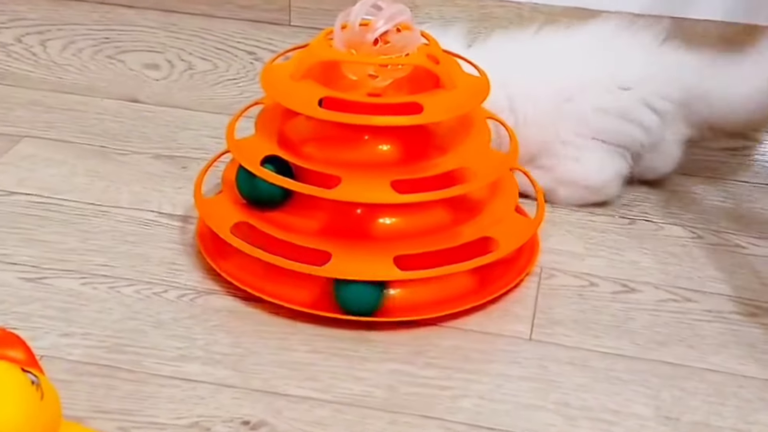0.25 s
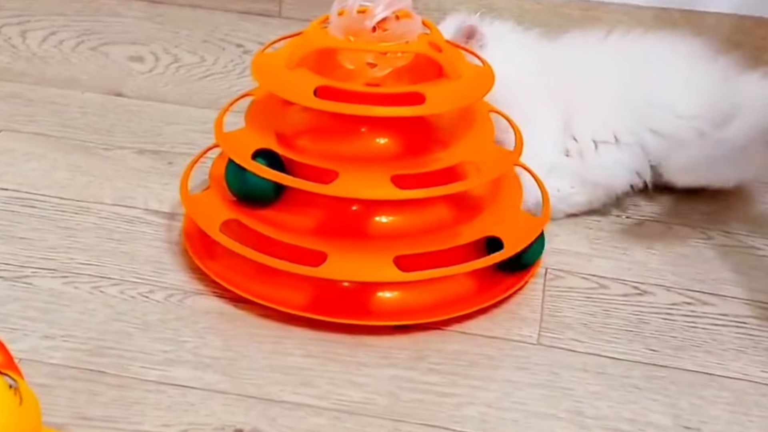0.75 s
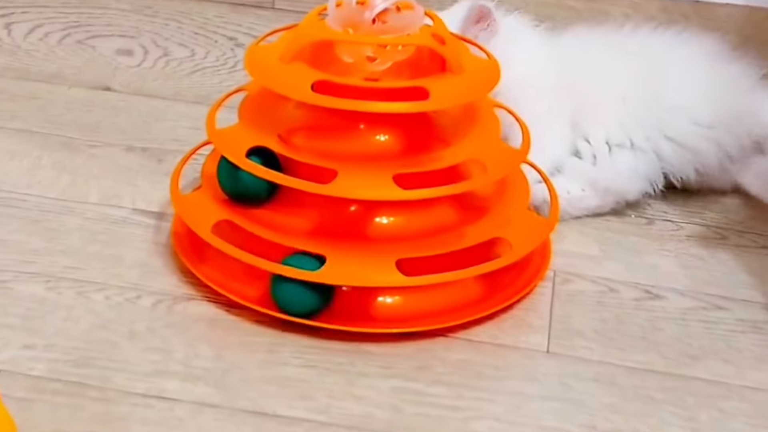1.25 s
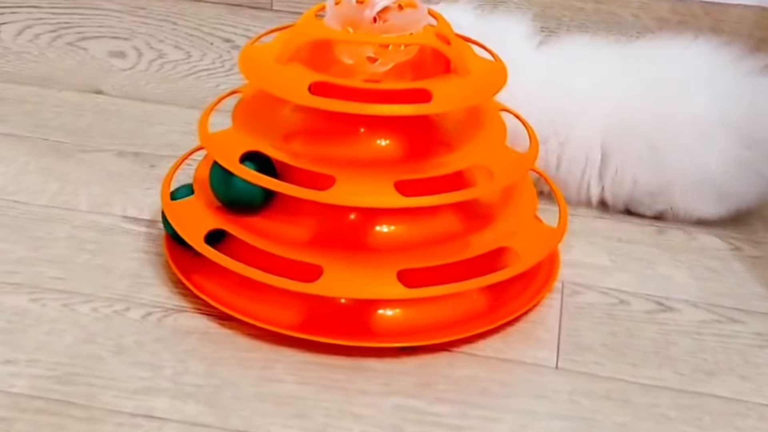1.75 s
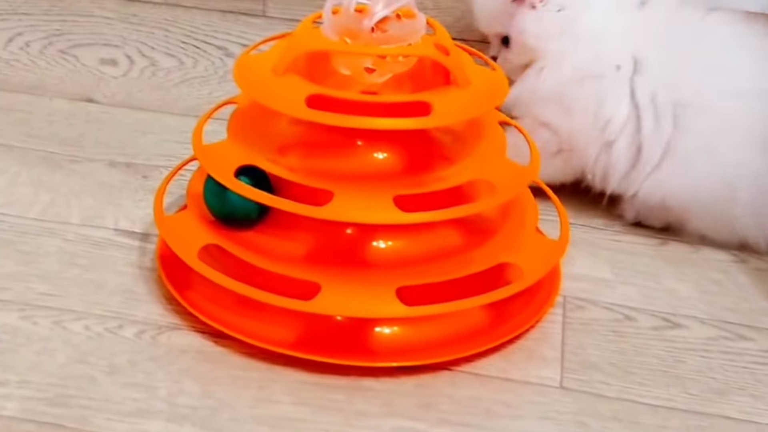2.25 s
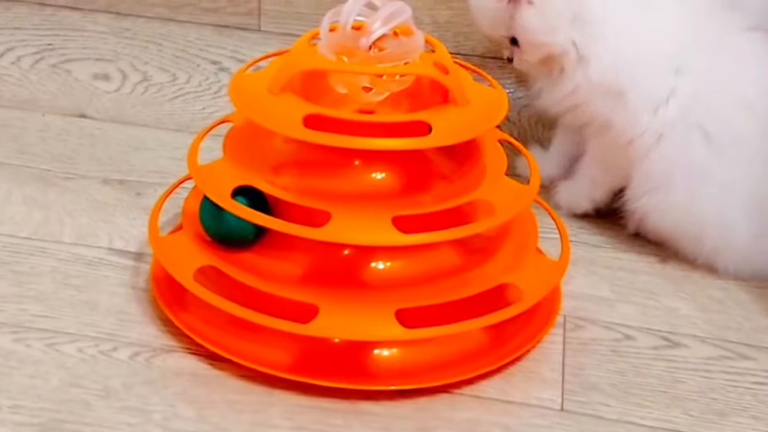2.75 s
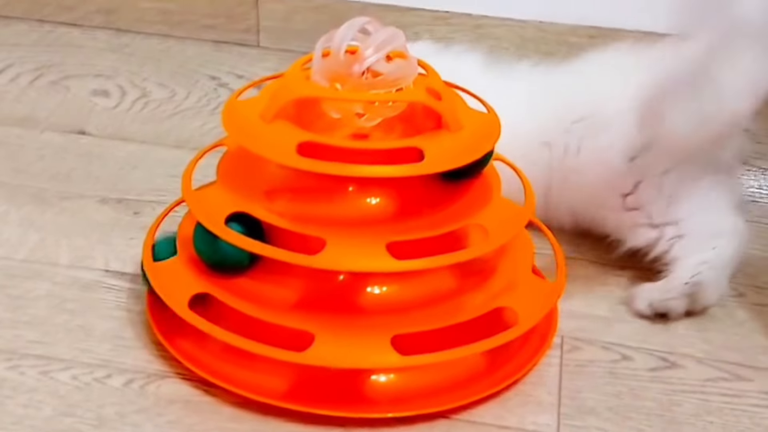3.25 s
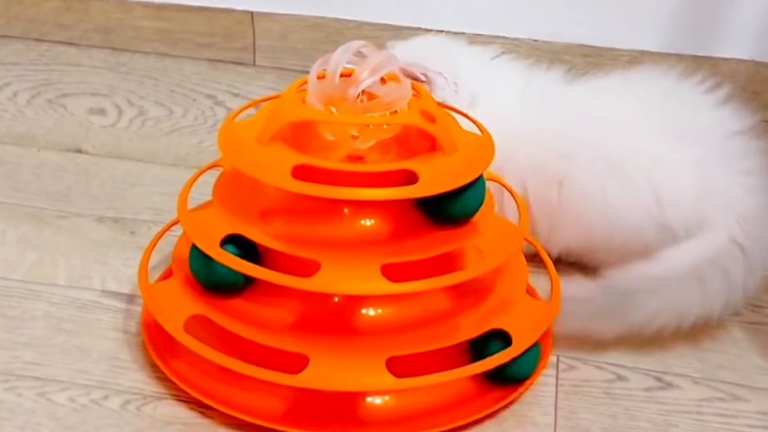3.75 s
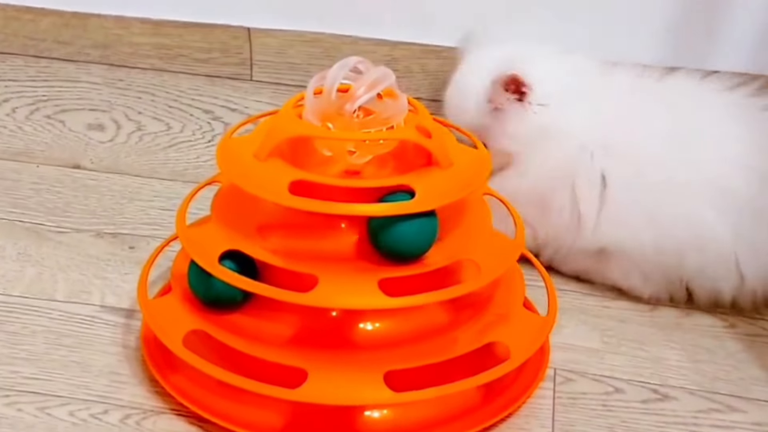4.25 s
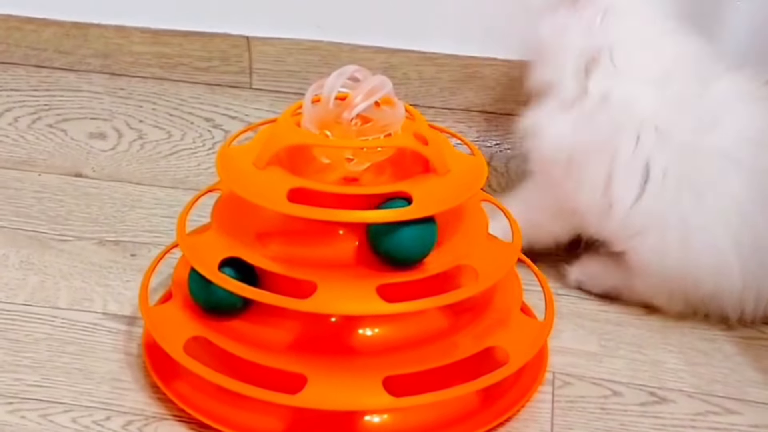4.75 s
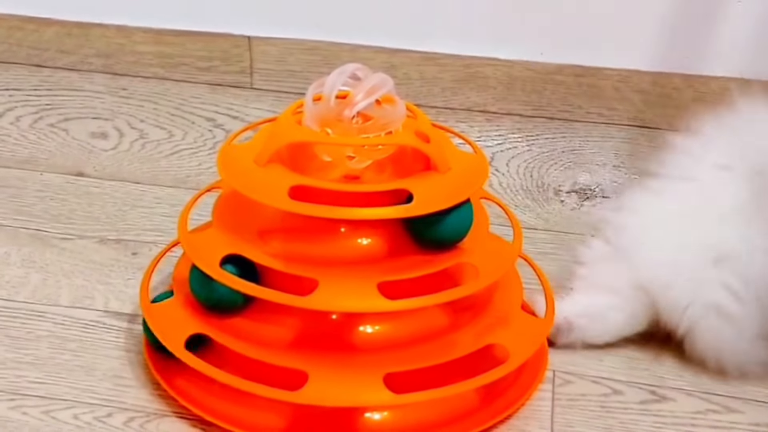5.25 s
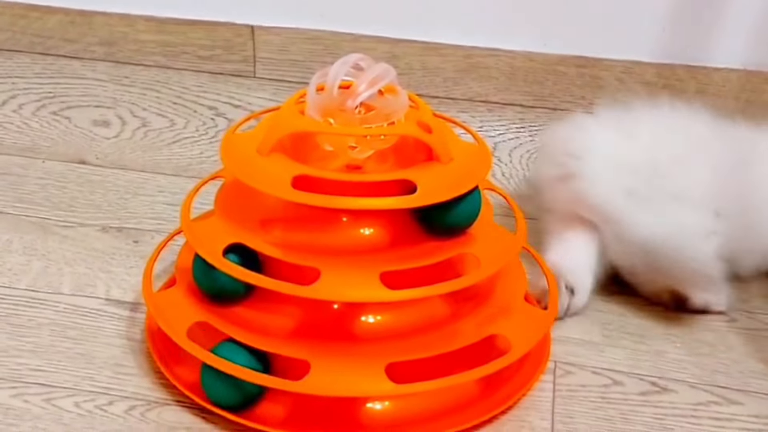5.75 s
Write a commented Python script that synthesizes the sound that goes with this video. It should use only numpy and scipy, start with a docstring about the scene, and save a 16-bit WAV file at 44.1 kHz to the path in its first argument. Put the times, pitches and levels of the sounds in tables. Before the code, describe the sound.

A hollow plastic ball travels round a toy tower on a hard floor as a kitten bats it, heard close in a small, hard room. At 0 s a brief scrape and low thump open with a clack; knocks follow near 0.3, 0.5 and, sharply, 0.7 s, over hollow, uneven rolling. From about 0.9 to 1.4 s the rolling is softer with small ticks. Between 1.5 and 2.8 s the toy is mostly faint, while low airy puffs buffet the right channel only. At 3.0-3.2 s comes the loudest burst: rapid hard clacks, gritty base scraping and floor rumble. Rolling surges from 3.3 to 3.9 s with clicks near 3.4, 3.6 and 3.8, then eases, with a tap at 4.5 s and a right-side puff just before. Around 5.0-5.3 s a softer scuffle brings knocks, thumps and a short roll. Faint rolling ends it over steady room tone and hiss.

```python
"""A hollow plastic ball rolls round the track of a toy tower, knocking over the track's joints.
A kitten's paw bats it and shoves the tower, so the base scrapes and the hard floor rumbles.
Ball, track and tower are noise and clicks sent through resonances; a small hard room answers the knocks.
A draught of shaped noise buffets the right of two microphone ports, which colour the toy differently.
Steady room tone and hiss lie underneath."""
import sys
import numpy as np
from scipy import signal
from scipy.fft import rfft, irfft, next_fast_len
from scipy.io import wavfile
from scipy.ndimage import uniform_filter1d, map_coordinates

SR = 44100
rng = np.random.default_rng(int(sys.argv[2]) if len(sys.argv) > 2 else 0)


def file_out(sig):
    """Save sig as 16-bit WAV at sys.argv[1]."""
    # one column per channel
    cols = np.atleast_2d(sig).T
    # limit, then scale
    lim = np.clip(cols, -1, 1)
    pcm = np.round(lim * 32767).astype(np.int16)
    wavfile.write(sys.argv[1], SR, pcm)


N = 264159


def amp(db):
    """Turn decibels into a plain multiplier."""
    return 10 ** (np.asarray(db) / 20)


def unit(x):
    """Scale a signal to an average (RMS) strength of 1."""
    return x / np.sqrt(np.mean(x ** 2) + 1e-20)


def along(points, hz):
    """Read each column of (f/Hz, value, ..) points at the wanted pitches, on a log axis."""
    f, *columns = np.transpose(points)
    return np.squeeze([np.interp(np.log(hz + 1), np.log(f + 1), column) for column in columns])


def curves(rows):
    """Join (t/s, value, ..) rows with straight lines: one value per sample for each column."""
    s, *columns = np.transpose(rows)
    return np.squeeze([np.interp(np.arange(N) / SR, s, column) for column in columns])


def wobble(rate):
    """A smooth random curve through `rate` random points a second."""
    knots = rng.standard_normal(int(N * rate / SR) + 4)
    return map_coordinates(knots, [np.arange(N) * rate / SR])


def swells(starts, lengths, levels_db, rise_s, fade_db_per_s, lead_s=0):
    """Sum of envelopes that rise, hold for their length and fade; lead_s starts them early."""
    t = np.arange(N) / SR + lead_s
    total = 0
    for s, length, db in np.broadcast(starts, lengths, levels_db):
        fading_s = np.maximum(t - s - rise_s - length, 0)
        total = total + np.clip((t - s) / rise_s, 0, 1) * amp(db - fade_db_per_s * fading_s)
    return total


def filtered(x, response):
    """Change the strength and timing of each frequency in x by a complex response."""
    m = next_fast_len(x.shape[-1] + 8192)  # spare room, so that the ringing does not wrap round
    return irfft(rfft(x, m) * response(np.fft.rfftfreq(m, 1 / SR)), m)[..., :x.shape[-1]]


def shelf(f, corner_hz):
    """0 in the bass, 1 in the treble, one half at the corner."""
    return f ** 4 / (f ** 4 + corner_hz ** 4)


def resonances(f, modes, order=1):
    """Causal sum of (f/Hz, width/Hz, level/dB) modes; a higher order darkens the valleys between."""
    total = 0
    for k, (centre, width, db) in enumerate(modes):
        peak = 1j * f * width / (centre * centre - f * f + 1j * f * width)
        total = total + (-1) ** k * amp(db) * peak ** order
    return total


# room tone and hiss, before one shared boost: f/Hz, left level/dB, right level/dB
ROOM_TONE = [(100, -83, -104), (472, -82, -67.5), (854, -94, -78.5), (1100, -83.5, -69.5),
             (1680, -92, -76.5), (1940, -91.5, -86), (4500, -95.5, -91.5), (6000, -98.5, -96.5),
             (7400, -92, -99), (9660, -101, -90), (14000, -93.5, -93), (16500, -99, -96)]


def room_tone():
    """Steady room tone and hiss: shaped noise, unrelated between the ports."""
    noise = rng.standard_normal((2, N))
    return filtered(noise, lambda f: amp(along(ROOM_TONE, f) + 43.5))


# buffeting of the right port between puffs: t/s, level/dB
DRAUGHT = [(0, -10), (.12, -22.5), (.42, -21), (.73, -17.5), (.8, -17.5), (1.03, -24.5), (1.08, -19),
           (1.14, -24), (1.34, -23), (1.41, -15.5), (1.52, -29), (1.92, -22.5), (2.09, -24), (2.3, -26),
           (2.56, -25), (2.74, -28.5), (3.05, -25), (3.42, -29), (3.8, -29), (3.93, -39), (4.1, -38),
           (4.16, -30), (4.36, -32.5), (4.6, -41), (4.83, -29.5), (5.01, -26.5), (5.3, -18.5),
           (5.38, -30.5), (5.58, -28.5), (5.82, -34.5), (5.94, -25.5), (5.99, -33)]
# how the strength of the eddies falls with pitch: f/Hz, level/dB
EDDIES = [(20, -2), (40, -1), (65, 2), (100, -5), (200, -11), (450, -21), (800, -36), (1500, -47),
          (4000, -110)]
# sharp puffs: t/s, flutter level/dB (relative), push level/dB (relative to the flutter),
# level/dB of the gust that carries the puff
PUFFS = [(0.927, -11, 4.5, -42), (1.152, -12.5, -28, -44), (1.554, -31, 11, -17), (1.6, -23.5, 17, -22),
         (1.655, -23, 11, -16), (1.727, -21.5, -7, -31), (1.801, -33, 24.5, -30), (1.847, -42, 15.5, -19.5),
         (1.872, -36, 30, -21), (1.965, -40, 12, -19), (1.998, -36, 1, -16), (2.163, -22.5, 9.5, -26.5),
         (2.385, -35.5, 19.5, -28), (2.479, -42, 25, -27), (2.6, -22.5, 1, -20), (2.679, -36.5, 25, -29),
         (2.768, -11, -27, -15), (3.459, -17, 0, -16), (3.51, -9, -6, -19), (3.681, -19, -7, -24),
         (4.411, -3.5, -9, -11), (4.757, -28.5, -9, -47), (5.098, -13.5, 0, -13.5), (5.134, -15, -12, -14),
         (5.613, -20, 6, -16.5), (5.635, -23, 9, -22.5), (5.698, -27, -11, -24)]
GUST_RISE_S, GUST_FADE_DB_PER_S = 0.015, 289


def puff(t, db, push_db):
    """A flutter of a few ms on a slower push of air."""
    burst = rng.standard_normal(len(t)) * np.exp(-((t - .004) / .0025) ** 2)
    flutter = filtered(burst, lambda f: resonances(f, [(398, 206, 0)]) ** 2 * (1 - shelf(f, corner_hz=1300)))
    push = np.sin(2 * np.pi * rng.uniform(69, 130) * t) * t / 0.013 * np.exp(1 - t / 0.0047)
    return amp(db + 4.5) * (flutter / np.abs(flutter).max() + amp(push_db + 2) * push)


def draught():
    """Lumpy eddies hit the right port only; stronger gusts reach higher in pitch and carry puffs."""
    s, *_, gust_db = np.transpose(PUFFS)
    gusts = swells(s, 0, gust_db, GUST_RISE_S, GUST_FADE_DB_PER_S, lead_s=0.013)
    level_db = 20 * np.log10(amp(curves(DRAUGHT)) + gusts)
    lumps = 2 * wobble(18)
    low_eddies = filtered(rng.standard_normal(N),
                          lambda f: amp(along(EDDIES, f)) * (1 - shelf(f, corner_hz=150.5)))
    low = unit(amp(lumps) * low_eddies)
    high_lumps = amp(2.9 * lumps + 3.14 * wobble(50))
    high_eddies = filtered(rng.standard_normal(N),
                           lambda f: amp(along(EDDIES, f)) * shelf(f, corner_hz=183))
    high = unit(high_lumps * high_eddies)
    # the high part grows faster than the low part as the wind strengthens
    wind = np.pad(amp(level_db) * low + amp(1.276 * level_db - 3.5) * high, (0, SR))
    t = np.arange(SR // 10) / SR
    for s, db, push_db, _ in PUFFS:
        wind[round(s * SR):][:len(t)] += puff(t, db, push_db)
    return wind[:N] * np.array([[0], [1]])  # left silent, right full


# tone of the floor's rumble: f/Hz, level/dB
BOARDS = [(25, -19), (60, -0.5), (90, 4.5), (150, 0.5), (260, -2.5), (400, 5.5), (1000, -70)]
# paws and tower landing on the boards: t/s, level/dB (relative), f/Hz
THUMPS = [(0, -11, 54), (0.029, -27, 76), (3.001, -24, 79.5), (3.05, -16, 73), (3.085, -21, 71.5),
          (3.143, -17, 93.6), (3.767, -32, 111), (5.022, -29, 100), (5.047, -21, 100), (5.135, -15, 125),
          (5.165, -17, 97), (5.289, -24.5, 93)]
REST_RUMBLE_DB, RUMBLE_FADE_DB_PER_S = -52, 400  # the boards are never quite still


def boards():
    """The floor rumbles under each shove and gives a few low cycles at each landing."""
    s, length, *_, rumble_db = np.transpose(SHOVES)
    shaking = amp(REST_RUMBLE_DB) + swells(s, length, rumble_db, SHOVE_RISE_S, RUMBLE_FADE_DB_PER_S)
    out = shaking * unit(filtered(rng.standard_normal(N), lambda f: amp(along(BOARDS, f))))
    t = np.arange(SR // 8) / SR
    for s, db, hz in THUMPS:
        swell = t * hz * np.exp(1 - t * hz)  # fullest after one cycle
        out[round(s * SR):][:len(t)] += amp(db) * np.sin(2 * np.pi * hz * t) * swell
    return out


# ways the ball and track ring, family by family: f/Hz, relative width/Hz, level/dB (relative)
TRACK = [
    [(652, 124, 4), (1120, 268, -0.5)],
    [(1557, 345, 2.5)],
    [(1917, 481, 0.5), (2580, 1300, -17.5)],
    [(2750, 285, -11)],
    [(3700, 247, 2.5)],
    [(4320, 364, 0), (4694, 350, -2.5), (5305, 250, -5)],
    [(6310, 300, -1.5), (7430, 500, 2)],
    [(12300, 4200, 2.5)],
]


def track(f, family_db, damping):
    """The track's ringing, each family at its own strength; more damping widens the modes."""
    modes = []
    for family, strength_db in zip(TRACK, family_db):
        for hz, width, db in family:
            modes.append((hz, 1.61 * width * np.clip(damping, .2, 4), db + strength_db))
    return resonances(f, modes, order=2)


# strength of the lower mode families under rubbing: level/dB
RUBBED = [6.5, 3, -2, -4.5, -3.5, -3.5, -4.5]
# shoves of the tower: t/s, length/s, scrape level/dB, treble level over the scrape/dB,
# floor rumble level/dB
SHOVES = [(0, 0.029, -32.5, -3, -20), (2.977, 0.085, -26.5, -9, -25.5), (3.082, 0.045, -34, -17, -30),
          (3.118, 0.0026, -38.5, 22.5, -34), (3.136, 0.027, -29.5, -14, -21),
          (3.193, 0.12, -45.5, -10, -54), (4.73, 0.33, -67, 9, -78), (5.01, 0.086, -45, -8, -31),
          (5.127, 0.11, -42.5, -15, -31), (5.228, .04, -45, -1, -26.5)]
SHOVE_RISE_S, SCRAPE_FADE_DB_PER_S = 0.0053, 330


def shoving():
    """The base slides: a gritty scrape in the track's modes and a smoother hiss above."""
    grit = rng.standard_normal((2, N)) * amp(2.1 * wobble(200))
    scrape = unit(filtered(grit, lambda f: track(f, [*RUBBED, -30], damping=1.74)))
    hiss = unit(filtered(rng.standard_normal((2, N)), lambda f: shelf(f, corner_hz=7000)))
    s, length, scrape_db, treble_db, _ = np.transpose(SHOVES)
    scrape_level = swells(s, length, scrape_db, SHOVE_RISE_S, SCRAPE_FADE_DB_PER_S)
    hiss_level = swells(s, length, scrape_db + treble_db, SHOVE_RISE_S, SCRAPE_FADE_DB_PER_S)
    return scrape_level * scrape + hiss_level * hiss


# air and wall resonances of the hollow tower: f/Hz, width/Hz, level/dB
SHELL = [(384.3, 89.5, -5), (428, 39.8, 2), (466.4, 29.6, 0), (539, 40.7, -1)]


def shell(f):
    """The hollow tower's resonances, made steep on both sides by one broad resonance."""
    return resonances(f, SHELL) * resonances(f, [(406, 390, 0)])


# rolling that surges and dies away: t/s, level/dB
ROLL = [(0, -45), (.18, -21.5), (.25, -23), (.43, -19), (.47, -18), (.62, -27), (1.11, -28), (1.23, -21),
        (1.32, -36), (1.48, -27), (1.6, -52), (2.16, -34.5), (2.3, -49.5), (2.64, -53), (2.72, -29),
        (2.92, -63), (3.32, -27), (3.43, -18), (3.52, -17), (3.56, -20.5), (3.72, -19), (3.76, -14),
        (3.9, -27), (4.33, -26.5), (4.49, -35), (4.76, -40.5), (4.89, -29), (4.97, -53), (5.19, -56),
        (5.23, -20), (5.3, -29.5), (5.38, -57), (5.82, -68), (5.89, -33.5), (5.99, -43)]
HOP_RISE_S, HOP_FADE_DB_PER_S = 0.0054, 160  # after a knock the ball hops and drums on the tower


def rolling():
    """Uneven bumps under the ball shake the hollow tower, with hops after knocks and faint chatter."""
    bumps = rng.standard_normal((3, N)) * amp(1.7 * wobble(60) + 1.1 * wobble(22.33))
    shared, left, right = filtered(bumps, shell)
    drum = np.array([unit(shared + 0.86 * left), unit(shared + 0.49 * right)])
    chatter = unit(filtered(bumps[1:], lambda f: track(f, [*RUBBED, -20], damping=0.89)))
    s, hop_db = np.transpose(KNOCKS)[[0, 4]]
    hops = swells(s, 0, hop_db, HOP_RISE_S, HOP_FADE_DB_PER_S)
    return (amp(curves(ROLL)) + hops) * (drum + amp(-33.5) * chatter)


# how long the room rings: f/Hz, time to fall by 60 dB/s
ROOM = [(500, 0.71), (1300, 0.33), (3500, 0.29), (9000, 0.3)]


def room(x):
    """A fresh noise tail per port, slightly late; each frequency dies at its own speed."""
    hz, t, z = signal.stft(rng.standard_normal((2, SR // 2)), SR, nperseg=256)
    fading = amp(-60 * t / along(ROOM, hz)[:, None])
    tail = signal.istft(z * fading, SR, nperseg=256)[1]
    late = np.pad(x, (250, 0))[None]  # delay in samples
    return signal.fftconvolve(late, tail / np.linalg.norm(tail[0]), axes=1)


# usual strength of each mode family in a knock: f/Hz, level/dB
STRUCK = [(1000, -14), (1500, -15), (2000, -17), (2800, -17), (3600, -23), (4700, -20.5), (7500, -16.5),
          (12000, -26)]
# knocks of ball and paw: t/s, level/dB (relative), tower thud level/dB (relative to the knock),
# rattle level/dB (relative), level/dB of the drumming that follows, brightness/dB per octave,
# favoured modes f/Hz, their spread/octaves, damping (relative),
# how much the spot struck favours those modes/dB
KNOCKS = [(0.028, -10, -5, -6, -28, 3, 2670, 0.13, 0.91, 10),
          (0.281, -14, 3.5, 0.5, -20, -1, 5000, 1, 0.81, 7),
          (0.478, -12, 10, -0.5, -15.5, 0, 1820, 0.38, 0.85, 7),
          (0.493, -34, 15, -11, -44, -7, 1900, .4, 0.69, 15),
          (0.6462, -31, -11, -15, -60, 5, 2700, .2, 0.92, 12),
          (0.6706, -21, -5, 7.5, -26, -2, 2570, 0.11, 0.69, 2),
          (0.6917, -4.5, 0.5, -5, -16.5, -0.5, 3350, 0.092, 0.83, 6),
          (0.8903, -32.5, 4, 12, -18, -1.5, 1590, 0.34, 0.64, 9.5),
          (1.31, -37.5, -4, 2, -60, -0.5, 7500, .3, 0.98, 9),
          (1.3716, -36.5, -6, 7, -38, -3, 4500, 0.35, .8, 10),
          (1.39, -34.5, 8, 4.5, -30, -3, 2030, 0.41, 0.92, 8),
          (2.9827, -3, -3.5, -10.5, -30, -6, 2630, 0.14, 0.68, 9),
          (2.9962, -12, 6, 5.5, -23, -0.5, 1500, .2, 0.48, 8.5),
          (3.02, -4, 0, -22, -24, -3, 4760, 0.21, .9, 11.5),
          (3.0972, -3.5, -31, -25, -17.5, -1, 1213, 0.34, 0.72, 10.5),
          (3.1752, -20, -27, -5, -30, 3, 6500, 0.77, 0.57, 8),
          (3.372, -16.5, -12, -1.5, -11, -3, 4300, 0.22, 0.54, 7),
          (3.5255, -42, -11, 6.5, -64, 4.5, 7500, .2, 0.45, 14),
          (3.5652, -12, -17, 0.5, -44, -2, 4340, 0.087, 0.43, 13),
          (3.582, -24.5, -8, 1, -60, -3, 4580, .15, 0.24, 15.5),
          (3.7668, -23, 13, 5, -15.5, -2, 1620, 0.5, 0.76, 8),
          (4.0032, -35, -16, 2.5, -20, -11, 1250, 0.33, 1, 9.5),
          (4.5197, -23.5, 2, -5.5, -25, -2.5, 2760, 0.18, 0.78, 6),
          (4.787, -52.5, -2, -3, -52, 9, 7500, .2, 0.43, 15.5),
          (4.9663, -39.5, 16, 7, -60, 2.5, 7500, .2, 0.57, 11),
          (5.0044, -29.5, -3, 5, -25, -4.5, 2650, 0.15, 0.64, 10),
          (5.109, -31, -10, 0, -60, 1.5, 4380, 0.18, .6, 13),
          (5.1375, -24, 11, -1, -41, -7.5, 1730, .5, 0.46, 9),
          (5.2075, -17.5, -17, 3.5, -21.5, -0.5, 3140, 1.02, 0.52, 22.5)]
# a louder rattle lasts longer: its length when the two levels add to 0 dB, and the drop that halves it
RATTLE_S, RATTLE_HALVES_DB = 0.052, 57


def knocks():
    """One sharp contact, a gritty rattle that holds and then dies, a thud of the tower, and the room."""
    out, t = np.zeros((2, N + 2 * SR)), np.arange(SR // 5) / SR
    hz, usual_db = np.transpose(STRUCK)
    for s, db, thud_db, rattle_db, _, tilt_db, favoured_hz, spread, damping, favour_db in KNOCKS:
        favour = np.exp(-(np.log2(hz / favoured_hz) / spread) ** 2)
        family_db = usual_db + tilt_db * np.log2(hz / 2800) + favour_db * favour
        noise = rng.standard_normal((4, len(t)))
        contact = 9 * (t == 0) + 1.8 * amp(-60 * t / 0.012) * noise[0]  # a click and a short rasp
        grit = amp(2.43 * unit(uniform_filter1d(noise[3], size=100))) * noise[1:3]
        rattle_s = RATTLE_S * 2 ** ((db + rattle_db) / RATTLE_HALVES_DB)
        hold = (1 - np.exp(-t / 0.00044)) * np.exp(-(t / rattle_s) ** 2.7)
        rattle = amp(rattle_db - 7.5) * hold * grit
        # parts in contact damp each other, so the snap's modes are wider than the rattle's
        snap = filtered(contact, lambda f: track(f, family_db, 2.5 * damping)
                        * amp(-3 * shelf(f, corner_hz=5400)))
        ringing = filtered(rattle, lambda f: track(f, family_db, .8 * damping))
        crack = amp(db + 7.0) * (snap + ringing)
        thud = amp(db + thud_db + 21) * filtered(amp(-60 * t / 0.023) * noise[0], shell)
        wet = amp(-2.0) * room(crack[0] + .5 * thud)
        out[:, round(s * SR):][:, :len(t)] += crack + thud
        out[:, round(s * SR):][:, :wet.shape[1]] += wet
    return out[:, :N]


# colour that each port gives to the toy: f/Hz, left level/dB, right level/dB
PORTS = [(100, 0, 2), (507, -7, -2.5), (1046, 1.5, 4.5), (2110, 7.5, 9), (2830, 9.5, 21.5), (3490, 1, 9),
         (3690, 1, -6), (4870, 3.5, 12.5), (5960, 11.5, -15), (5990, 0, -11), (8460, 4.5, -28),
         (8900, -6.5, -16), (12000, 3.5, -9), (15500, 6, -27)]


def scene():
    """The toy is heard through the coloured ports; draught and room tone are added after."""
    toy = rolling() + knocks() + shoving() + boards()
    return filtered(toy, lambda f: amp(along(PORTS, f))) + draught() + room_tone()


TOP_HZ = 15900  # nothing passes from here up


def record(dry):
    """The deepest bass is cut, peaks round off at full scale, nothing passes above the band limit."""
    cut = filtered(dry, lambda f: -f * f / (45 ** 2 - f * f + 1j * f * 55))
    rounded = cut / (1 + np.abs(cut) ** 8) ** (1 / 8)
    return filtered(rounded, lambda f: f < TOP_HZ)


dry = scene()
out = record(dry)
file_out(out)
```